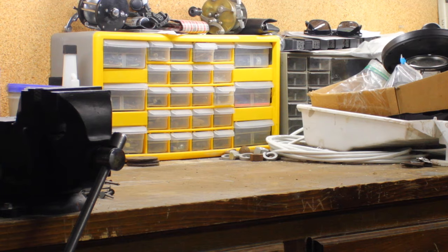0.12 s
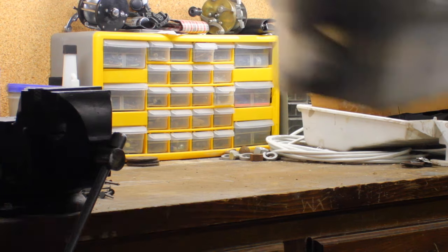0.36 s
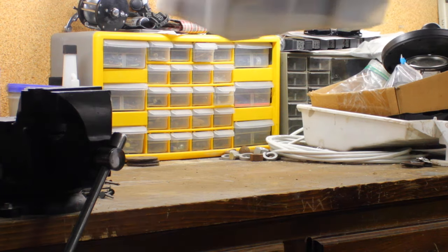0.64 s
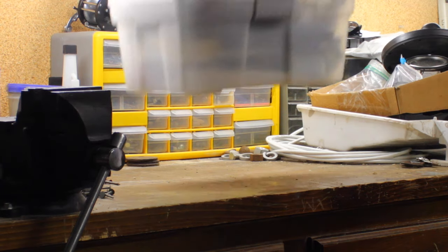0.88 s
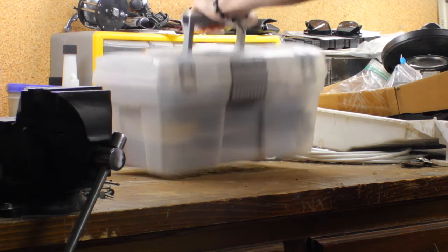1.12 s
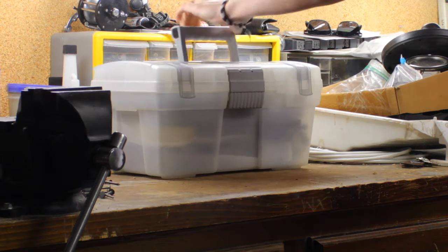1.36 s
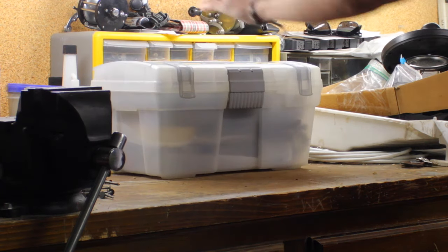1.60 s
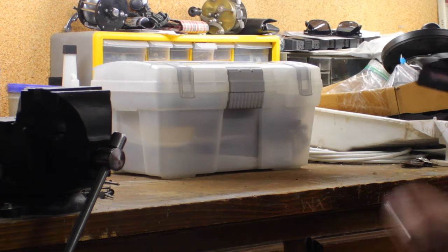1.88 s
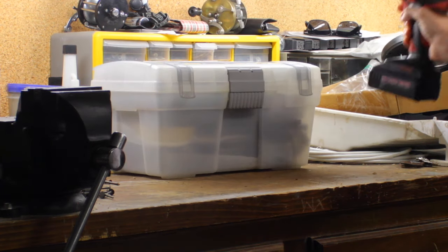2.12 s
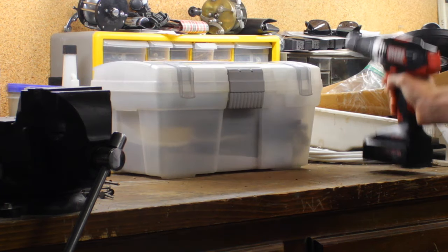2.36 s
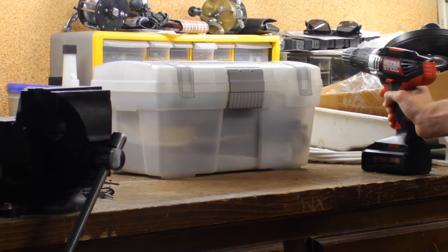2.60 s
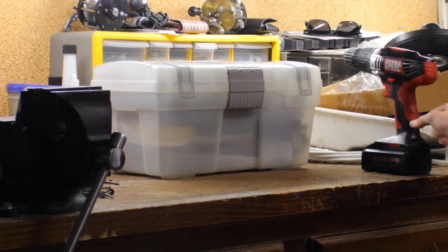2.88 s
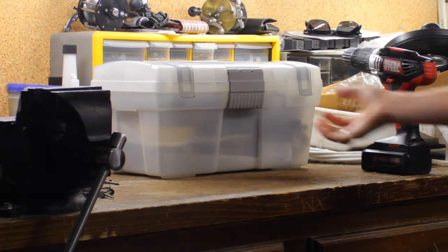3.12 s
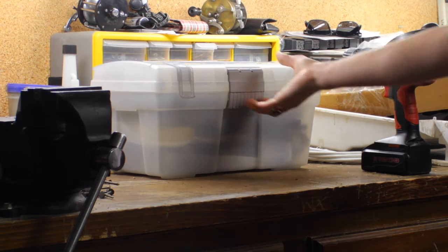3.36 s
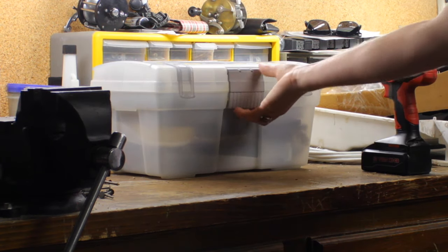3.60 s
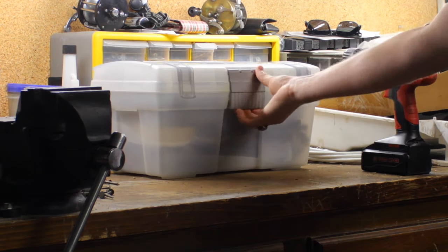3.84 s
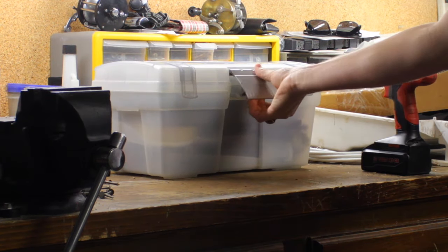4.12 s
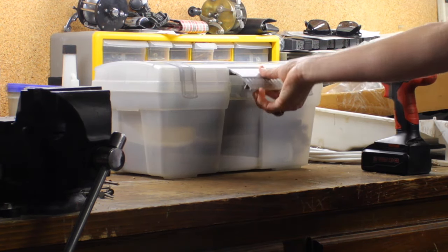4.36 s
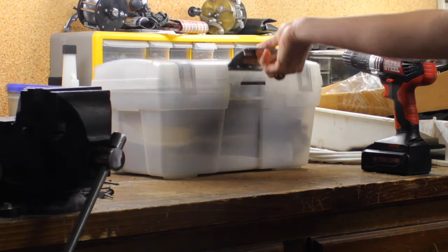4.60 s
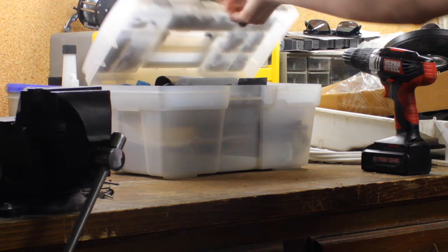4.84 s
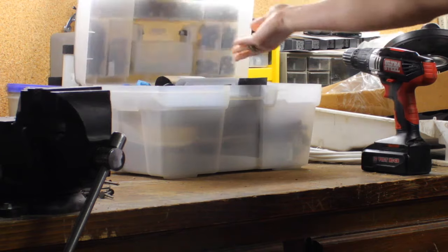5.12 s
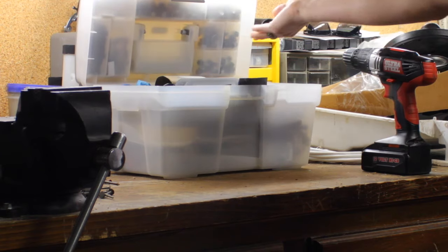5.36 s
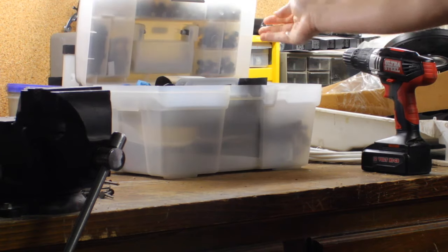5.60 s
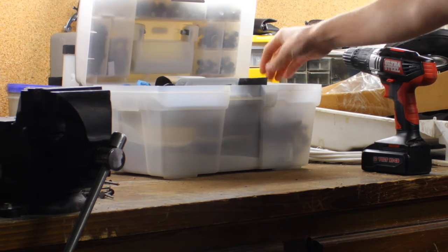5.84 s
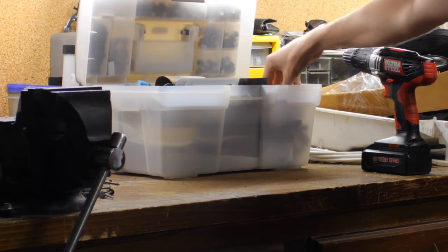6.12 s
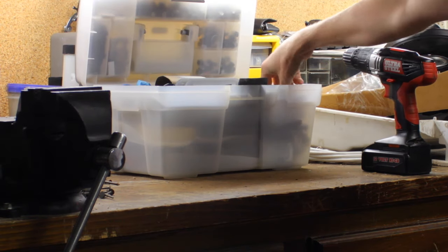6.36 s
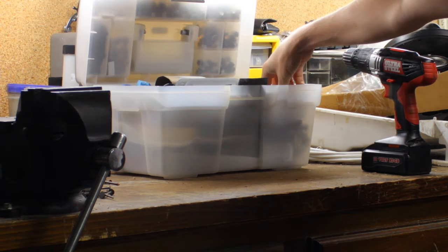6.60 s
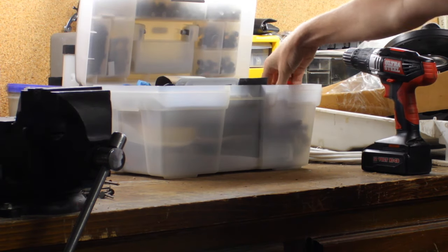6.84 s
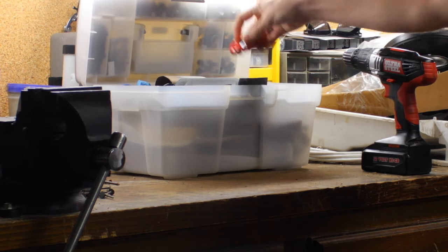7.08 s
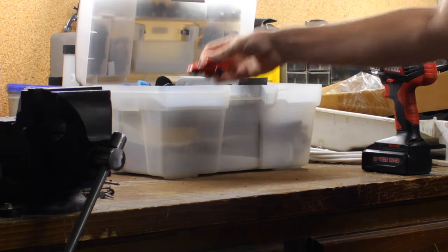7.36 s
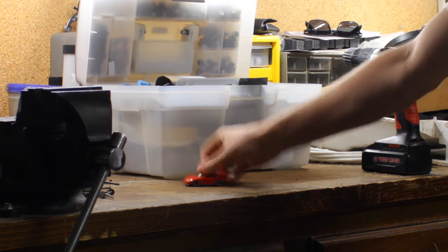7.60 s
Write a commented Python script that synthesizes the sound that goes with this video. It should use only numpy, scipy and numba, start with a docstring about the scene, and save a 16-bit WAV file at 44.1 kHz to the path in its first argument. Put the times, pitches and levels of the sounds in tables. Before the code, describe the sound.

In a small, hard-walled workshop, a hollow plastic box bangs onto a wooden bench and its handle smacks down. A cordless drill lands with a boomy thud and thin metallic ring. After quiet creaks, the latch clacks, the lid swings up with a clattering spill of loose pieces, and fingers pick softly among small parts before a final sharp knock on the bench. Close microphone, loud hits slightly clipped, room tone and faint hum.

```python
"""Toolbox and drill on a workshop bench

A plastic storage box lands on a wooden bench in a small hard-walled workshop; its handle drops, a cordless
drill is stood beside it, the latch snaps, the lid swings up with its contents sliding, and a hand picks among
small parts. Knocks are short chattering contacts ringing box and planks, rubs are swells of band-passed noise
or tiny collisions, metal is wavering modes. Dense echoes, room tone and a faint hum surround them; peaks clip."""
import sys
import numpy as np
from scipy import signal
from scipy.fft import rfft, irfft
from scipy.io import wavfile
from numba import njit

SR = 44100
rng = np.random.default_rng(int(sys.argv[2]) if len(sys.argv) > 2 else 0)


def waveform_to_disk(signal):
    """Save audio, clipped to [-1, 1], as 16-bit WAV at the path in sys.argv[1]."""
    frames = np.transpose(np.atleast_2d(signal))
    scaled = np.clip(frames, -1, 1) * 32767
    samples = np.round(scaled).astype(np.int16)
    wavfile.write(sys.argv[1], SR, samples)


def how_loud(loudness_db):
    """Turn decibels into a plain amplitude multiplier (0 dB gives 1, 20 dB gives 10)."""
    steps = np.asarray(loudness_db, float) / 20
    return 10 ** steps


N = 340487
T = np.arange(N) / SR

# every hard contact: (time [s], what is struck, rim clack [dB], hollow thud [dB], wall knock [dB])
CONTACTS = [(0.669, "handle", -26.5, -37.5, -40), (0.7398, "handle", -15, -26, -19),
            (1.263, "base", -1.5, -4.5, -5.5), (1.285, "base", 1.5, -22, -22),
            (1.6671, "top", 2, -15, -8.5), (2.515, "drill", 2, -8.5, -54),
            (3.492, "latch", -31, -30.5, -47), (3.6004, "latch", -38.5, -42, -49),
            (3.7146, "latch", -26.5, -32.5, -27), (3.7516, "latch", -30.5, -34.5, -62),
            (4.0167, "catch", -3.5, -9, -30), (4.097, "latch", -40, -33, -52),
            (4.1393, "latch", -45, -45, -53), (4.2198, "latch", -34, -41, -52),
            (4.411, "hinge", -35.5, -44, -43), (4.443, "hinge", -33, -48, -64),
            (4.584, "edge", -27.5, -40.5, -41), (4.6882, "lid", -34, -50, -48),
            (4.7112, "lid", -24, -40, -41), (4.74, "lid", -28.5, -38, -64), (4.9204, "lid", -24, -44, -37),
            (4.938, "lid", -45, -39, -30.5), (4.9794, "lid", -28, -28.5, -21.5),
            (5.049, "lid", -4.5, -19, -14.5), (5.1852, "edge", -15.5, -40, -48),
            (5.1912, "lid", -10, -24, -16.5), (5.2499, "lid", -9, -22, -40),
            (5.3896, "edge", -27, -47, -36), (6.0911, "bit", -23.5, -46, -35.5),
            (6.103, "tool", -13.5, -36.5, -26.5), (6.2541, "tool", -31, -45.5, -65),
            (6.4321, "tray", -26.5, -43.5, -47), (6.6191, "bit", -41, -55.5, -55),
            (6.639, "tray", -30, -55, -37), (6.6479, "tray", -29, -42.5, -33),
            (6.7961, "tray", -37, -40.5, -44), (6.8589, "tray", -37, -52, -43.5),
            (6.887, "tray", -37, -47, -38), (6.9767, "tray", -29, -50, -39.5),
            (6.9992, "tray", -28, -40, -33), (7.1879, "part", -47, -50, -35.5),
            (7.3886, "part", -35.5, -75, -71.5), (7.7108, "bench", -3.5, -25.5, -10)]


def unit(x):
    """Scale to rms 1."""
    return x / np.sqrt(np.mean(x ** 2))


@njit
def svf(x, hz, q):
    """State-variable band-pass with a moving centre, gain 1 there."""
    y, b, l = np.empty(len(x)), 0., 0.
    for i in range(len(x)):
        g = np.tan(np.pi * hz[i] / SR)
        v = (b + g * (x[i] + 1e-18 - l)) / (1 + g * (g + 1 / q))
        b, l, y[i] = 2 * v - b, l + 2 * g * v, v / q
    return y


def band(x, hz, q):
    """Band-pass at a fixed or moving centre."""
    return svf(x, np.clip(hz + 0 * x, 1, SR / 2 - SR / 20), 1. * q)


def steep(x, hz, q):
    """The band-pass applied twice."""
    return band(band(x, hz, q), hz, q)


def colour(x, points):
    """Shape a spectrum by (frequency [Hz], level [dB]) points."""
    hz, db = np.transpose(points)
    f = np.log(np.fft.rfftfreq(len(x), 1 / SR) + 1)
    return irfft(rfft(x) * how_loud(np.interp(f, np.log(hz), db)), len(x))


def add(out, s, x):
    """Mix x into out from time s."""
    i = int(s * SR)
    out[i:i + len(x)] += x[:len(out) - i]


def die_away(t, t60):
    """Exponential decay that falls 60 dB in t60."""
    return np.exp(-np.log(1000) * t / t60)


def earlier():
    """The room still sounds from something set down a moment before: a fading broad band of noise."""
    # the fading echo: (level [dB], t60 [s], centre [Hz])
    db, t60, hz = (-48, 2.1, 420)
    return how_loud(db) * die_away(T, t60) * unit(steep(rng.standard_normal(N), hz, 0.27))


def room_tone():
    """Steady room tone with preamp hiss: noise with a fixed spectrum."""
    # spectrum before the overall level is set: (frequency [Hz], level per Hz [dB])
    spectrum = [(15, -30.5), (25, -3.5), (49, -6.5), (175, -8.5), (354, -13.5), (439, -13.5), (714, -13),
                (936, -14), (1130, -14), (1440, -17), (3430, -19), (8830, -28), (14400, -28.5),
                (16000, -26.5)]
    return how_loud(-52.5) * unit(colour(rng.standard_normal(N), spectrum))


def hum():
    """A low hum that comes and goes: noise in a narrow band, so its strength also wavers."""
    # slow swell of the hum: (time [s], level [dB])
    swell = [(0.0, -66.5), (1.9, -60.5), (2.6, -51), (3.1, -53.5), (4.302, -55.5), (5.2, -59.5), (6.3, -70),
             (7.72, -69)]
    centre_hz, width_hz = 182, 10
    s, db = np.transpose(swell)
    tone = unit(band(rng.standard_normal(N), centre_hz, centre_hz / width_hz))
    return how_loud(np.interp(T, s, db)) * tone


def rub(source, rows, q):
    """Each movement speeds up, then dies away, sounding through a broad resonance."""
    out, t, source = np.zeros(N), T[:2 * SR], unit(source)
    for s, rise_s, db, t60, hz in rows:
        speed = np.minimum(t / rise_s, 1) ** 2 * die_away(np.maximum(t - rise_s, 0), t60)
        # every movement takes its own stretch of the source
        stretch = np.roll(source, -int(s * SR))[:len(t)]
        # a lower resonance passes a narrower band, so it is raised to match
        rubbing = steep(stretch, hz, q) * np.sqrt(SR / hz / 4)
        add(out, s, how_loud(db) * speed * rubbing)
    return out


def brush():
    """Sleeve and box brush past: smooth friction noise."""
    # brushing movements: (start [s], rise [s], level [dB], t60 [s], centre [Hz])
    strokes = [(0.06, 0.051, -43, .3, 2840), (0.72, 0.2, -36.5, 0.45, 2970)]
    return rub(rng.standard_normal(N), strokes, q=0.64)


def room(x):
    """Dense echoes after the first wall; the highest treble dies first."""
    # reverberation time: (frequency [Hz], t60 [s])
    fade_times = [(100, 0.39), (260, 0.54), (700, 0.64), (1840, 0.69), (4850, 0.72), (12800, 0.19)]
    # echo energy: (frequency [Hz], level [dB])
    echo_colour = [(100, -4), (300, -9), (1000, -7), (3000, -10), (6000, -9.5), (10000, -14.5),
                   (14000, -10.5)]
    gap_s = 0.0025
    t, tail = T[:SR], 0
    log_hz, t60s = np.log(np.array(fade_times)[:, 0]), np.array(fade_times)[:, 1]
    for hz in 63 * 2 ** np.arange(0, 8.1, .5):  # half-octave bands
        t60 = np.interp(np.log(hz), log_hz, t60s)
        # dividing by sqrt(t60) keeps long-lived bands from gaining energy
        tail = tail + band(rng.standard_normal(SR), hz, 1.91) / np.sqrt(t60) * die_away(t, t60)
    # silent for one gap, at full strength after two
    tail = colour(tail * np.clip(t / gap_s - 1, 0, 1), echo_colour)
    return signal.fftconvolve(x, how_loud(-30.5) * tail)[:N]


def push(hits, modes, size):
    """Soft contacts of a given length in samples ring a set of low modes."""
    force = np.zeros(N)
    for s, db in hits:
        add(force, s, how_loud(db) * np.diff(np.hanning(size)))
    return sum(how_loud(db) * band(force, hz, hz / width) for hz, width, db in modes)


def hollow_box():
    """The air and walls of the hollow box thud with every contact."""
    # modes of the hollow box: (frequency [Hz], width [Hz], level [dB])
    box_modes = [(308.8, 58, 12), (483.5, 52, 0.5), (221, 24, 0.5), (560, 23, -3.5)]
    thuds = [(s, thud_db) for s, _, _, thud_db, _ in CONTACTS]
    return how_loud(35) * push(thuds, box_modes, size=70)


def bench_planks():
    """Weight coming onto the bench sets its planks booming."""
    # weight on the bench: (time [s], level [dB])
    loads = [(0.669, -40.5), (0.738, -41), (1.261, -22.5), (1.285, -24), (1.668, -30.5), (2.514, -15.5),
             (3.49, -33.5), (3.714, -37.5), (4.016, -29), (5.05, -37.5)]
    # modes of the planks: (frequency [Hz], width [Hz], level [dB])
    plank_modes = [(51, 57, -9), (74, 22, -26.5), (131.6, 30, -7.5), (174.6, 88, -2)]
    return how_loud(46.5) * push(loads, plank_modes, size=200)


def panel(force, hz, q, sharp_db):
    """A damped panel with one sharper mode in its middle."""
    return steep(force, hz, q) + how_loud(sharp_db) * steep(force, hz, 9)


def knocks():
    """Each contact chatters briefly: walls knock, rims clack, edges tick; returns sound for us and the room."""
    # by what is struck: (wall pitch [Hz], rim clack centre [Hz], edge tick over the clack [dB],
    # sharp mode over the broad one [dB])
    struck = {"handle": (1097, 2189, -43, -5), "base": (490.5, 1502, -21, -3),
              "top": (691.5, 1830, -21.5, 1), "drill": (1194, 1562, -25.5, -33),
              "latch": (871, 1978, -24, 1.5), "catch": (500, 1805, -15, -1),
              "hinge": (950.5, 6002.5, -7.5, 0), "edge": (1200, 2800, -32, 3.5),
              "lid": (1146, 1796, -37, -27), "tool": (1282, 2686, -23, -3),
              "tray": (1145.5, 1781, -23, -17), "bit": (1285, 3560, -26, 11),
              "part": (1149.5, 4320, -18, -10), "bench": (710.5, 2730.5, -13.5, -7.5)}
    wall_gain_db, rim_gain_db, edge_gain_db = 14.5, 2, 6.5  # how well each part turns force into sound
    chatter_db, crack_db = -1.5, -12.5  # crack: the hard first touch
    t60_s, fade_shape, rise_s = 0.041, 1.303, .001
    direct, spread = np.zeros(N), np.zeros(N)
    t = T[:SR // 8]
    fade = die_away((t / t60_s) ** fade_shape, 1) * (1 - np.exp(-t / rise_s))
    # a single impulse with the energy of the whole chatter
    click = np.sqrt(np.sum(fade ** 2)) * (t == 0)
    for s, what, clack_db, _, wall_db in CONTACTS:
        wall_hz, clack_hz, tick_db, sharp_db = struck[what]
        chatter = how_loud(chatter_db) * fade * rng.standard_normal(len(t)) + how_loud(crack_db) * click
        # summed over all directions the chatter loses its fine comb, so the room hears a smooth blow
        for out, force in ((direct, chatter), (spread, click)):
            wall = panel(force, wall_hz, 0.79, sharp_db)
            rim = panel(band(force, clack_hz, q=0.39), clack_hz, 0.65, sharp_db)
            edge = steep(force, 4600, .5)
            add(out, s, how_loud(wall_db + wall_gain_db) * wall)
            add(out, s, -how_loud(clack_db + rim_gain_db) * rim)  # neighbouring modes swing opposite
            add(out, s, how_loud(clack_db + tick_db + edge_gain_db) * edge)
    low = hollow_box() + bench_planks()
    return direct - low, spread - low


def ring(modes, hits, width_hz):
    """Loose metal keeps jostling, so each mode wavers while it fades."""
    out, t = np.zeros(N), T[:SR // 2]
    for s, hit_db in hits:
        for hz, db, t60 in modes:
            # the second half of the noise, where the narrow filter has settled
            waver = unit(band(rng.standard_normal(SR), hz, hz / width_hz)[-len(t):])
            add(out, s, how_loud(hit_db + db) * die_away(t, t60) * waver)
    return out


def drill_steel():
    """The drill's chuck and bit ring high and thin."""
    # modes of chuck and bit: (frequency [Hz], level [dB], t60 [s])
    steel_modes = [(6767, 0, .45), (9850, -24, .3), (11220, -6, .28), (14530, -16, .28), (15150, -11, .3)]
    # when they are set ringing: (time [s], level [dB])
    steel_hits = [(2.526, -27.5)]
    return ring(steel_modes, steel_hits, width_hz=39)


def rattle(per_s, spread_db):
    """Dense tiny collisions of unequal size."""
    hit, size, sign = rng.random((3, N))
    sizes = how_loud(-spread_db * np.log(size + 1e-9))
    return (hit < per_s / SR) * sizes * np.sign(sign - .5)


def creaks():
    """Low creaks of the rocking drill, the flexing latch and the pressed box, as dense tiny slips."""
    # creaking movements: (start [s], rise [s], level [dB], t60 [s], centre [Hz])
    slides = [(2.88, 0.058, -49.5, 3.5, 300), (3.5, .05, -34, 0.31, 315), (3.65, 0.056, -45, 0.33, 357),
              (3.93, 0.079, -29.5, 0.071, 290), (4.596, 0.0064, -30.5, 0.047, 467),
              (4.65, 0.056, -35, 0.26, 336), (6.78, 0.056, -37.5, 0.4, 340)]
    return rub(rattle(per_s=3000, spread_db=0.5), slides, q=1.65)


def tumble():
    """Loose contents collide, thrown about by the lid, then stirred by the fingers."""
    # tumbling movements: (start [s], rise [s], level [dB], t60 [s], centre [Hz])
    spills = [(4.9, 0.043, -39, .6, 2500), (4.967, 0.0095, -26, 0.36, 2560),
              (5.04, 0.014, -18, 0.081, 2540), (5.05, .03, -33, 0.5, 2580),
              (5.178, 0.013, -25.5, 0.3, 2750), (5.21, .06, -24, 0.41, 2640), (6.62, .027, -39, 0.25, 1300),
              (6.79, 0.014, -50.5, 1.4, 1300), (6.956, .022, -51, 0.19, 1300),
              (6.99, 0.017, -57, 0.28, 1300)]
    return rub(rattle(per_s=2400, spread_db=2), spills, q=0.7)


def metal_part():
    """A small metal part rings as the hand picks among the pieces."""
    # modes of the part: (frequency [Hz], level [dB], t60 [s])
    part_modes = [(1400, -1, 0.48), (2930, -18.5, .15), (3700, -14, 0.16), (4340, 1, 0.32),
                  (6750, -10, 0.2), (7670, -8, 0.23)]
    # when it is set ringing: (time [s], level [dB])
    part_hits = [(7.187, -47)]
    return ring(part_modes, part_hits, width_hz=44)


def scene():
    """All sources stand on one bench; knocks and rubs share one room, the thin metal rings stay dry."""
    direct, spread = knocks()
    rubs = brush() + creaks() + tumble()
    metal = drill_steel() + metal_part()
    background = earlier() + room_tone() + hum()
    return (direct + rubs + metal + room(spread + rubs) + background)[None]


@njit
def limiter(x, limit_db, bite, sense_s, hold_s, release_s):
    """Watches its own clipped output: cuts while that is too loud, holds the cut, then lets go."""
    y, power, cut_db, wait = np.empty(len(x)), 1e-12, 0., 0.
    for i in range(len(x)):
        y[i] = min(max(x[i] * 10 ** (cut_db / 20), -1.), 1.)
        power += (y[i] ** 2 - power) / (sense_s * SR)
        over_db = 10 * np.log10(power + 1e-12) - limit_db
        wait -= 1 / SR
        if over_db > 0:
            # bite: cut speed in dB per second for each dB over
            cut_db, wait = cut_db - bite * over_db / SR, hold_s
        elif wait < 0:
            cut_db -= cut_db / (release_s * SR)
    return y


def low_pass(x):
    """Removes everything above the highest recorded frequency."""
    return signal.sosfilt(signal.butter(12, 16500, fs=SR, output="sos"), x)


def record(dry):
    """Microphone low cut, limiter with clipping, top cut."""
    low_cut = signal.butter(2, 48, "high", fs=SR, output="sos")
    top_cut = signal.ellip(8, .2, 60, 15800, fs=SR, output="sos")
    mic = signal.sosfilt(low_cut, dry[0])
    limited = limiter(mic, limit_db=-11.5, bite=270.0, sense_s=.05, hold_s=.58, release_s=0.06)
    mix = signal.sosfilt(top_cut, limited[None])
    return low_pass(mix)


dry = scene()
out = record(dry)
waveform_to_disk(out)
```